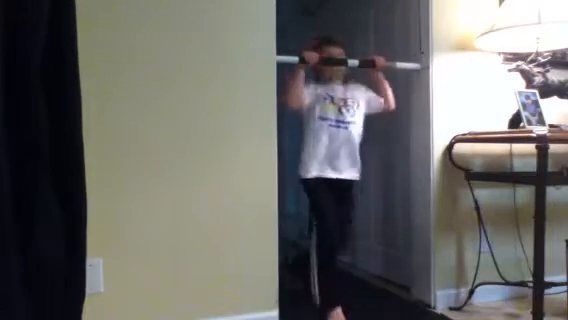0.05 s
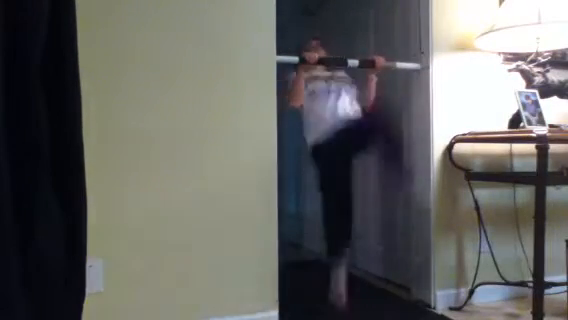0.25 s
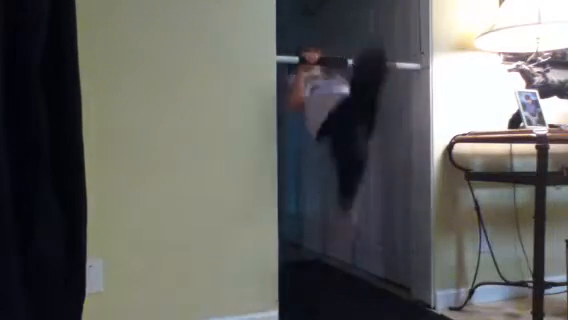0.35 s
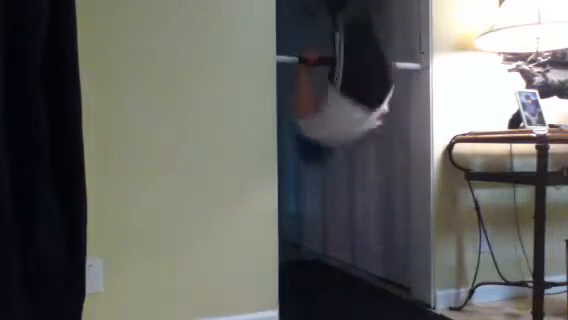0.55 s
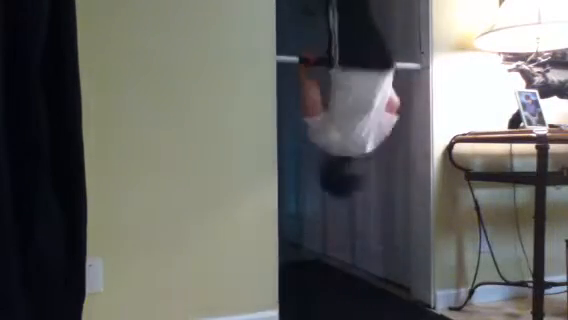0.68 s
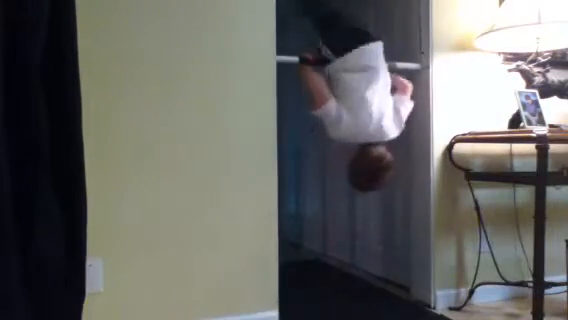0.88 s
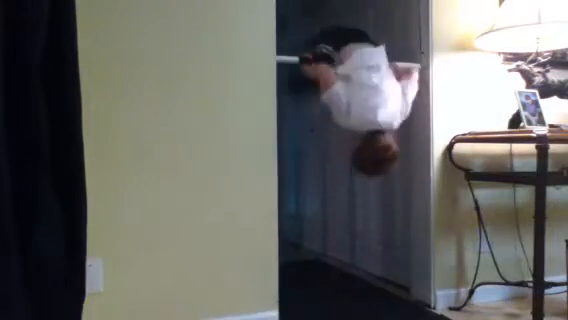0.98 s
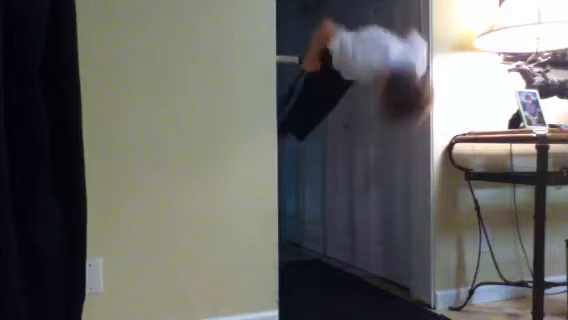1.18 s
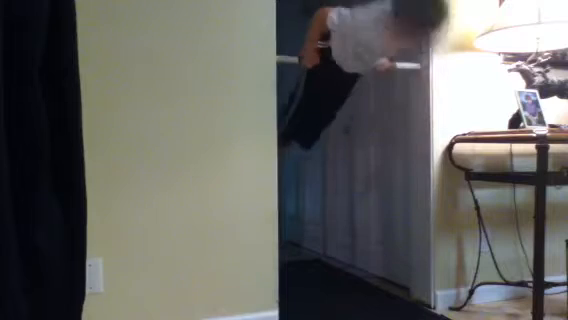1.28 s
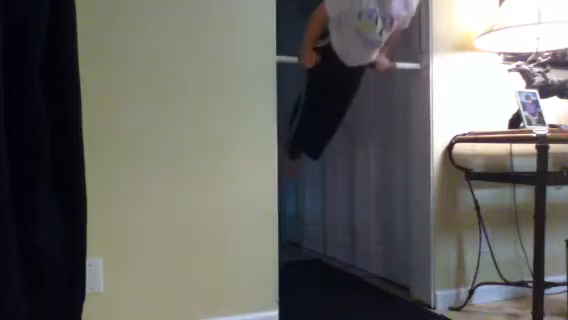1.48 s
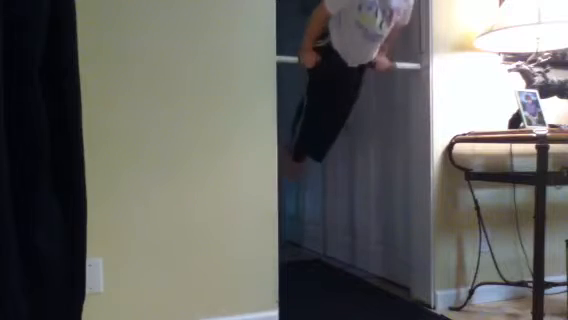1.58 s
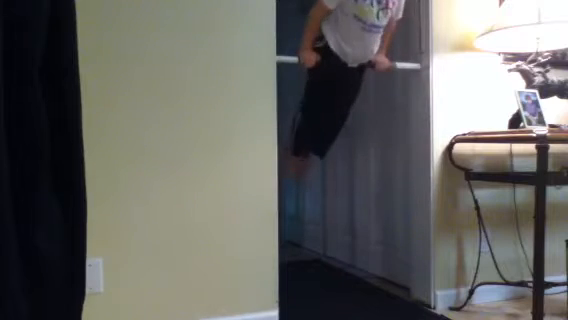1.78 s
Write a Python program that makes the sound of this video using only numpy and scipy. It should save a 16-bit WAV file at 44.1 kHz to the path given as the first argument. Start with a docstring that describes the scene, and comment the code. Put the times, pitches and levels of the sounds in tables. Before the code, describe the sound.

In a small room, a metal doorway bar rattles under a child's weight. Two foot thuds and a short scuff come first, followed by sharp clacks with a faint ring, then lighter ticks and low wooden thumps.

```python
"""Dry snaps and low thumps of wood open the scene: a bar wedged in a doorway takes a child's weight.
One foot knocks and scuffs along the floor, the other thuds as it pushes off. As the child swings over,
the metal bar clacks in its sleeve, and its ends tick and thump against the frame of the small room.
Impacts are short pulses shaped by a spectrum, free vibrations are sums of damped modes, and
friction is noise that follows the motion."""
import sys
import numpy as np
from scipy import signal
from scipy.io import wavfile

SR = 44100
rng = np.random.default_rng(int(sys.argv[2]) if len(sys.argv) > 2 else 0)


def file_out(sig):
    """Save sig as 16-bit WAV at sys.argv[1]."""
    # one column per channel
    cols = np.atleast_2d(sig).T
    # limit, then scale
    lim = np.clip(cols, -1, 1)
    pcm = np.round(lim * 32767).astype(np.int16)
    wavfile.write(sys.argv[1], SR, pcm)


N = 81585


def amp(db):
    """Amplitude ratio of a level in decibels."""
    return 10 ** (np.asarray(db) / 20)


def unit(x):
    """Normalisation to unit energy."""
    return x / np.sqrt(np.sum(x ** 2) + 1e-20)


def read(points, hz):
    """Interpolation on a logarithmic frequency axis."""
    f, value = np.transpose(points)
    return np.interp(np.log(hz + 1), np.log(f + 1), value)


def curve(rows):
    """Linear interpolation in time of each column, at every sample."""
    times, *columns = np.transpose(rows)
    return [np.interp(np.arange(N) / SR, times, column) for column in columns]


def add(mix, at, sound):
    """Superposition: a sound joins the mix at a time in seconds."""
    part = mix[max(round(at * SR), 0):][:len(sound)]
    part += sound[:len(part)]


def colour(x, spectrum, tilt_db=0, size=4096):
    """Minimum-phase filtering at unit energy, with a tilt per octave above 200 Hz."""
    hz = abs(np.fft.fftfreq(size, 1 / SR))
    log_gain = np.log(amp(read(spectrum, hz) + tilt_db * np.log2(np.maximum(hz, 200))))
    taps = np.fft.ifft(np.exp(np.conj(signal.hilbert(log_gain)))).real
    return signal.fftconvolve(x, unit(taps[:size // 2]))[:len(x)]


def contact(decay_s, grit, size=2048):
    """Impact excitation: an impulse, then surface chatter of relative strength grit."""
    t = np.arange(size) / SR
    chatter = unit(rng.standard_normal(size) * np.exp(-t / decay_s))
    return unit((t == 0) + grit * chatter)


def blows(times, levels_db, decay_s, grit):
    """Superposition of impacts, each with its own chatter."""
    out = np.zeros(N)
    for at, db in zip(times, levels_db):
        add(out, at, amp(db) * contact(decay_s, grit))
    return out


def ring(modes, rise_s, scatter_db):
    """Free vibration: damped modes with random phases and scattered levels."""
    t = np.arange(SR // 2) / SR
    tone = np.zeros(len(t))
    for hz, db, t60 in modes:
        envelope = amp(db + scatter_db * rng.standard_normal()) * np.exp(-np.log(1000) * t / t60)
        tone += envelope * np.sin(2 * np.pi * (hz * t + rng.random()))
    return unit(tone * (1 - np.exp(-t / rise_s)))


def rings(times, levels_db, modes, rise_s, scatter_db):
    """Superposition of free vibrations: each blow loads the modes differently."""
    out = np.zeros(N)
    for at, db in zip(times, levels_db):
        add(out, at, amp(db) * ring(modes, rise_s, scatter_db))
    return out


# Reverberation time of the room: f/Hz, T60/s
REVERB_TIMES = [(60, 0.43), (250, 0.26), (1000, 0.34), (4000, 0.25), (8000, 0.25), (15000, 0.27)]
def room(x, wet_db, build_s=.022, wall_delay_s=.022, wall_db=-12):
    """Reverberation: reflections build up and decay band by band; the far wall adds an echo."""
    t = np.arange(SR * 3 // 4) / SR
    reflections = rng.standard_normal(len(t)) * (rng.random(len(t)) < .3) * (1 - np.exp(-t / build_s))
    hz, times, bands = signal.stft(reflections, SR, nperseg=256)
    decay = np.exp(-np.log(1000) * times / read(REVERB_TIMES, hz)[:, None])
    tail = unit(signal.istft(bands * decay, SR)[1])
    add(tail, wall_delay_s, amp(wall_db) * contact(decay_s=.0052, grit=.55))
    return x + amp(wet_db) * signal.fftconvolve(x, unit(tail))[:N]


# Spectrum of the noise floor: f/Hz, relative level/dB
NOISE_SPECTRUM = [(25, -22), (50, -9.5), (80, -6.5), (150, -3), (290, -6.5), (450, -20.5), (800, -22),
                  (1500, -22.5), (3000, -24), (6000, -26), (9500, -26.5), (12000, -27), (15000, -30),
                  (15800, -22.5)]
def background(level_db=-58):
    """Stationary noise: low room rumble and microphone hiss."""
    return amp(level_db) * colour(rng.standard_normal(2 * N), NOISE_SPECTRUM)[N:]


# Envelope of the rustle: t/s, level/dB
RUSTLE_ENVELOPE = [(0, -62), (.085, -59.5), (.12, -58), (.2, -49), (.3, -41.5), (.41, -48.5), (.47, -60),
                   (.55, -66), (.95, -58.5), (1.2, -62), (1.3, -56), (1.45, -58), (1.85, -67.5)]
# Spectrum of rubbing cloth: f/Hz, relative level/dB
CLOTH_SPECTRUM = [(100, -22.5), (300, 5), (700, -3), (1400, -10.5), (2300, -16), (4500, -15.5),
                  (9000, -16.5), (15500, -45)]
def clothes():
    """Friction noise: cloth rubs softly as the body moves."""
    level_db, = curve(RUSTLE_ENVELOPE)
    return colour(rng.standard_normal(N) * amp(level_db), CLOTH_SPECTRUM)


# The heaviest loads on floor and wall: t/s, level/dB
HEAVY_LOADS = [(.225, -33), (0.986, -24), (1.251, -31)]
# Modes of floor and wall: f/Hz, relative level/dB, T60/s
BUILDING_MODES = [(49.7, -1, .65), (75, -24, 0.46)]
def sway():
    """Structural resonance: floor and wall answer a load with a deep, faint shudder."""
    times, levels_db = np.transpose(HEAVY_LOADS)
    return rings(times, levels_db, BUILDING_MODES, rise_s=.012, scatter_db=1)


# Snaps of the wood: t/s, level/dB
SNAP_EVENTS = [(0.0882, -21), (.096, -24), (1.3461, -22.5), (1.3503, -26.5)]
# Spectrum of a snap: f/Hz, relative level/dB
SNAP_SPECTRUM = [(100, -2), (300, 0.5), (900, -5), (1600, 3.5), (2600, -9), (3250, 4.5), (3700, 2.5),
                 (4500, -2.5), (7500, -9), (11000, -8), (15500, -33)]
def wood_snaps():
    """Broadband transients: wood snaps drily as it takes a load."""
    times, levels_db = np.transpose(SNAP_EVENTS)
    snaps = blows(times, levels_db, decay_s=.0034, grit=3)
    return room(colour(snaps, SNAP_SPECTRUM), wet_db=-1.5)


# Sweep of the sole over the floor: t/s, level/dB, brightness (0 to 1)
SOLE_SWEEP = [(.207, -48, 0.1), (.227, -36, 0), (.232, -31, 0), (.256, -28.5, 0.4), (.271, -27.5, 0.8),
              (.278, -34.5, 1), (.2835, -26, 1), (.292, -43, 1), (.33, -73, 0.9)]
# Spectrum of slow sliding: f/Hz, relative level/dB
SLOW_SLIDE_SPECTRUM = [(100, -21), (230, -12), (320, 18.5), (450, -24), (800, 0.5), (1400, -4), (2400, -8),
                       (3500, -4), (4800, 1.5), (6000, 4), (8000, -3.5), (11300, -5), (12200, -19),
                       (15500, -20)]
# Spectrum of fast sliding: f/Hz, relative level/dB
FAST_SLIDE_SPECTRUM = [(100, -25), (300, 2), (600, -1), (1400, -18), (2400, -31), (4200, -6), (6000, 2.5),
                       (8700, 4), (11300, -8), (12200, -7), (15500, -22)]
def scuff(catches_per_s=1400, catch_spread_db=3, catch_decay_s=.0003, catch_share=.45):
    """Sliding friction: tiny slips merge into a swish that brightens with speed; catches crackle in it."""
    level_db, brightness = curve(SOLE_SWEEP)
    t = np.arange(N) / SR
    caught = rng.random(N) < catches_per_s / SR
    catches = caught * amp(catch_spread_db * np.minimum(rng.exponential(1, N), 2))
    power = signal.lfilter([1], [1, -np.exp(-1 / (catch_decay_s * SR))], catches ** 2)
    slips = rng.standard_normal(N) * np.sqrt(1 - catch_share + catch_share * power / power.mean())
    sliding = (t > SOLE_SWEEP[0][0]) & (t < SOLE_SWEEP[-1][0])
    slips *= amp(level_db) * sliding
    slow = colour(slips * (1 - brightness), SLOW_SLIDE_SPECTRUM)
    fast = colour(slips * brightness, FAST_SLIDE_SPECTRUM)
    return room(slow + fast, wet_db=-6)


# Feet striking the floor: t/s, thud level/dB, slap level/dB
FOOTFALLS = [(.2122, -27, -10.5), (.2150, -12, -30), (.2182, -6, -15), (.2216, -12.5, -18),
             (.238, -15.5, -36), (.3659, -17, -31), (.3695, -10.5, -33.5), (.376, -13.5, -24),
             (.3891, -13, -49)]
# Spectrum of a thud: f/Hz, relative level/dB
THUD_SPECTRUM = [(40, -30), (100, -30), (180, -21), (300, 1.5), (550, 0), (900, -4.5), (1450, -5),
                 (2100, -27), (5000, -19.5), (16000, -63)]
# Spectrum of a slap: f/Hz, relative level/dB
SLAP_SPECTRUM = [(100, -7), (1000, -5), (1700, 2), (2500, -9.5), (5500, -2), (9500, -1), (12000, -9),
                 (15500, -26)]
def steps():
    """Soft-body impact: a foot gives a dull thud, its skin a bright slap."""
    times, thud_db, slap_db = np.transpose(FOOTFALLS)
    thud = colour(blows(times, thud_db, decay_s=.0015, grit=.83), THUD_SPECTRUM)
    slap = colour(blows(times, slap_db, decay_s=.004, grit=3.5), SLAP_SPECTRUM)
    return room(thud, wet_db=-2.5) + room(slap, wet_db=1.5)


# Shifts of weight on the door frame: t/s, push level/dB, boom level/dB
WEIGHT_SHIFTS = [(0.073, -24, -42), (0.111, -21, -30), (0.2217, -16, -8.5), (.243, -25, -22),
                 (0.2856, -31, -13), (0.3702, -13, -8), (0.3804, -20.5, -21), (0.823, -28, -19.5),
                 (0.9773, -17, -27), (0.9849, -13, -13.5), (0.991, -18.5, -18), (1.003, -31, -33),
                 (1.045, -22, -19), (1.1254, -29.5, -49), (1.243, -21, -24.5), (1.255, -20.5, -17),
                 (1.27, -20.5, -40), (1.295, -19, -28), (1.351, -25, -16), (1.378, -16, -28),
                 (1.428, -25, -22.5), (1.522, -20, -21), (1.548, -21.5, -21.5), (1.566, -27, -18.5),
                 (1.649, -32, -32), (1.7403, -22, -24), (1.83, -27, -22)]
# Modes of the door frame: f/Hz, relative level/dB, T60/s
DOOR_FRAME_MODES = [(145.2, -3.5, 0.18), (215.7, -13.5, 0.53), (235, -7, .13), (289, -3.5, 0.25),
                    (328.5, -2.5, 0.17), (436, -12, 0.071), (544.4, -8, 0.17), (663, -10.5, 0.18)]
def frame(push_hz=214.5, push_sigma_s=.002):
    """Forced, then free vibration: each shift of weight pushes the wood, and the frame booms after it."""
    times, pushes_db, booms_db = np.transpose(WEIGHT_SHIFTS)
    pushes = np.zeros(N)
    for at, db in zip(times, pushes_db):
        t = np.arange(N) / SR - at
        envelope = np.exp(-(t / push_sigma_s) ** 2 / 2)
        pushes -= amp(db) * unit(np.cos(2 * np.pi * push_hz * t) * envelope)
    booms = rings(times, booms_db, DOOR_FRAME_MODES, rise_s=.0021, scatter_db=7)
    return room(pushes, wet_db=-5.5) + booms


# The bar's ends bearing on the jamb: t/s, level/dB
KNOCK_EVENTS = [(1.2425, -37), (1.352, -23), (1.368, -26), (1.391, -35), (1.429, -39), (1.510, -26.5),
                (1.553, -31), (1.731, -32)]
# Spectrum of a knock: f/Hz, relative level/dB
KNOCK_SPECTRUM = [(100, -15), (300, 5), (500, -4), (740, 6.5), (1000, -5), (1350, 7), (2200, -14),
                  (6000, -39), (15500, -57)]
def jamb_knocks(tone_gain_db=-4):
    """Band-limited excitation: dull knocks on the wood stir only the bar's two lowest modes."""
    times, levels_db = np.transpose(KNOCK_EVENTS)
    tones = rings(times, levels_db + tone_gain_db, METAL_BAR_MODES[:2], rise_s=.002, scatter_db=2)
    knocks = blows(times, levels_db, decay_s=.002, grit=1.15)
    return room(colour(knocks, KNOCK_SPECTRUM), wet_db=-6) + tones


# High, quickly damped modes of the metal tube: f/Hz, relative level/dB, T60/s
BRIGHT_TUBE_MODES = [(5250, -8, .008), (5530, -1, .015), (5760, -2, .015), (8480, -22, .028)]
def tube(times, levels_db):
    """Convolution: the chatter of each contact roughens the tube's short, bright ring."""
    out = np.zeros(N)
    for at, db in zip(times, levels_db):
        chatter = contact(decay_s=.0007, grit=.45)
        response = ring(BRIGHT_TUBE_MODES, rise_s=.00062, scatter_db=1)
        add(out, at, amp(db) * unit(signal.fftconvolve(response, chatter)))
    return room(out, wet_db=-22)


# Slips of the end pads: t/s, tick level/dB, tilt/(dB per octave), ring level/dB
PAD_SLIPS = [(0.2, -34, 1, -52), (1.236, -33, 2.5, -37), (1.2416, -26.5, 0, -31), (1.266, -45, 7, -37),
             (1.327, -28.5, 0.5, -55), (1.352, -25.5, -1, -48), (1.367, -34, -8.5, -54),
             (1.427, -37.5, -6, -55), (1.5085, -28.5, 1.5, -41), (1.551, -40, -7, -53),
             (1.725, -25, 0, -35), (1.731, -37, 2, -32), (1.817, -32.5, 1.5, -43),
             (1.8226, -24, 0.5, -30.5)]
# Spectrum of a tick: f/Hz, relative level/dB
TICK_SPECTRUM = [(100, -18), (300, -7), (720, -3.5), (1000, -2), (1380, 3.5), (1850, -5), (2400, -9),
                 (3500, -8), (5600, -8), (6500, -5.5), (9000, -7), (12000, -19.5), (15500, -50)]
def bar_ends():
    """Stick-slip friction: the end pads slip on the wood in short ticks that also ring the tube."""
    times, ticks_db, tilts_db, ring_db = np.transpose(PAD_SLIPS)
    ticks = np.zeros(N)
    for at, db, tilt_db in zip(times, ticks_db, tilts_db):
        add(ticks, at, amp(db) * colour(contact(decay_s=.0069, grit=5.2), TICK_SPECTRUM, tilt_db))
    return room(ticks, wet_db=3) + tube(times, ring_db)


# The bar striking its sleeve: t/s, clack level/dB, ring level/dB
SLEEVE_IMPACTS = [(0.794, -19.5, -33), (.798, -20, -17), (.822, -29, -39), (0.8254, -16.5, -25),
                  (0.9563, -28, -33), (.960, -23.5, -26), (.971, -20.5, -26), (.974, -25.5, -20.5),
                  (0.98, -21, -33), (.983, -21, -21), (.998, -41, -28), (1.3461, -26, -44),
                  (1.349, -24, -26.5)]
# Spectrum of a clack: f/Hz, relative level/dB
CLACK_SPECTRUM = [(100, -10), (400, -9.5), (750, -3), (1000, -1.5), (1400, -1), (1900, -2), (2500, -4),
                  (3000, -5), (4000, -4), (5600, -5.5), (6400, -12.5), (8600, -9.5), (11000, -20.5),
                  (15500, -52)]
# Lasting modes of the bar: f/Hz, relative level/dB, T60/s
METAL_BAR_MODES = [(754, 2, .34), (1346, 2.5, .28), (1690, -3, .2), (2450, 3, .26), (2516, 2.5, .3),
                   (3241, -1.5, .25), (3428, -1.5, .28), (3747, -3, .26), (4517, -5, .26), (5280, -4, .17),
                   (8500, -13, .14), (9157, -12, .17)]
def bar(tone_gain_db=-3):
    """Hard impact: metal tubes collide with a broad clack, a bright ring and faint lasting tones."""
    times, clack_db, ring_db = np.transpose(SLEEVE_IMPACTS)
    tones = rings(times, clack_db + tone_gain_db, METAL_BAR_MODES, rise_s=.00061, scatter_db=.5)
    clacks = blows(times, clack_db, decay_s=.0042, grit=4)
    return room(colour(clacks, CLACK_SPECTRUM), wet_db=0) + tones + tube(times, ring_db)


def scene():
    """Superposition of all sources at one microphone."""
    contacts = wood_snaps() + steps() + scuff() + bar() + bar_ends() + jamb_knocks()
    return (contacts + frame() + sway() + clothes() + background())[None]


def record(dry, cutoff_hz=15680):
    """Band limiting by a steep linear-phase low-pass filter."""
    lowpass = signal.firwin(511, cutoff_hz, window=("kaiser", 9), fs=SR)
    return signal.oaconvolve(dry, lowpass[None], "same")


dry = scene()
out = record(dry)
file_out(out)
```